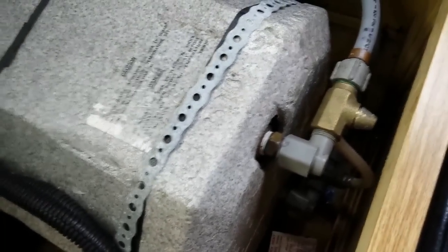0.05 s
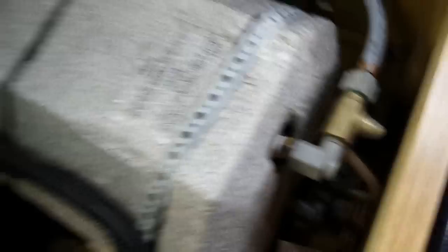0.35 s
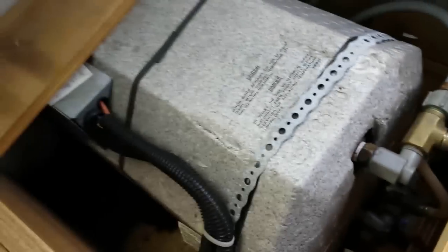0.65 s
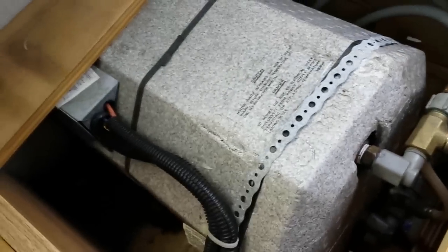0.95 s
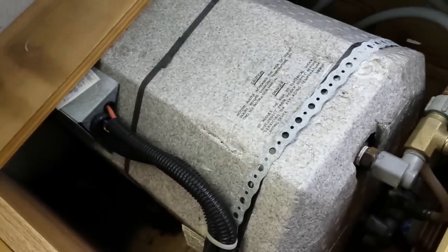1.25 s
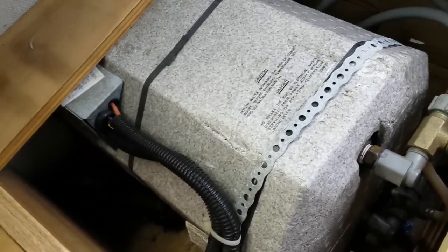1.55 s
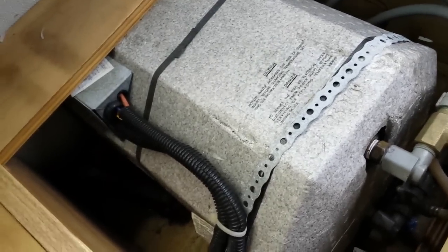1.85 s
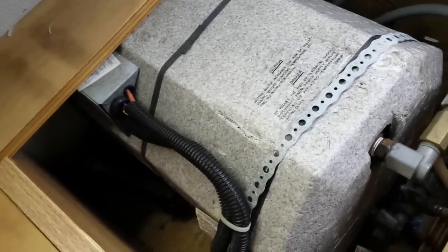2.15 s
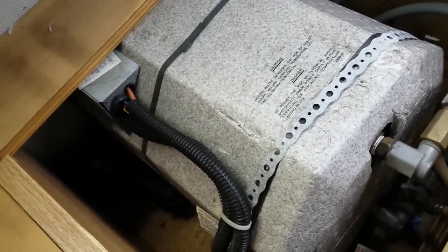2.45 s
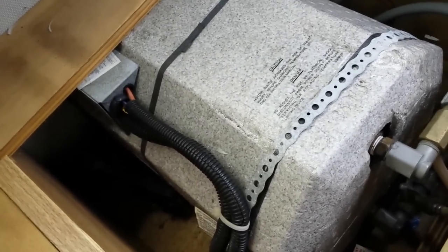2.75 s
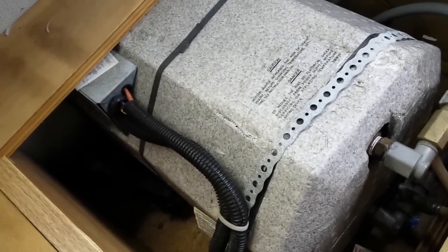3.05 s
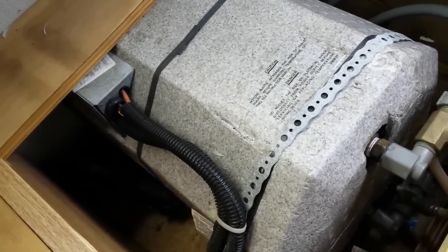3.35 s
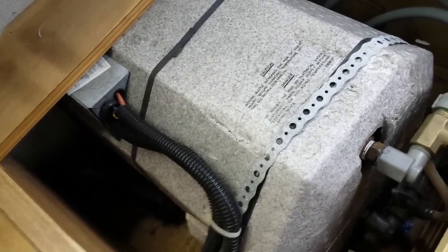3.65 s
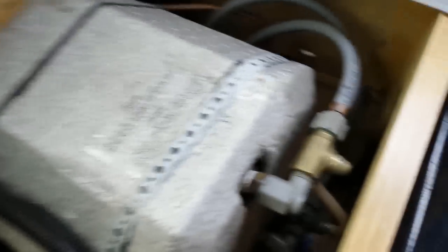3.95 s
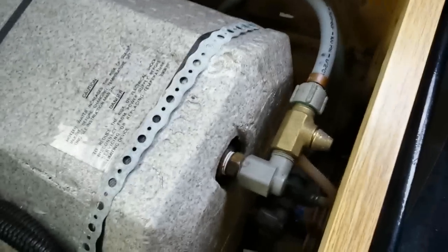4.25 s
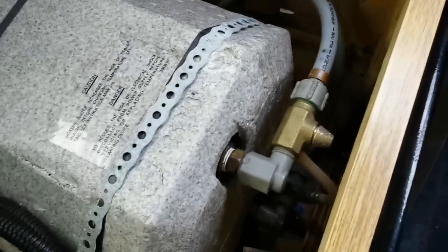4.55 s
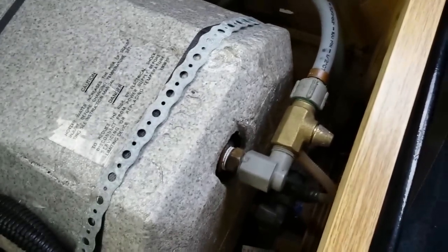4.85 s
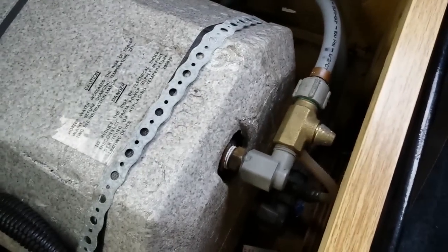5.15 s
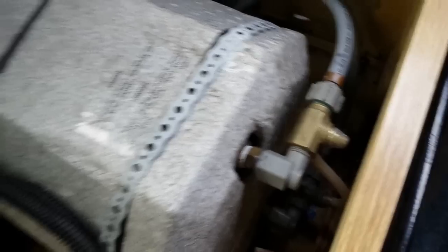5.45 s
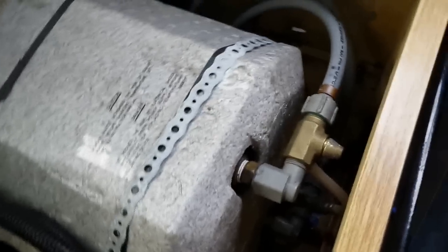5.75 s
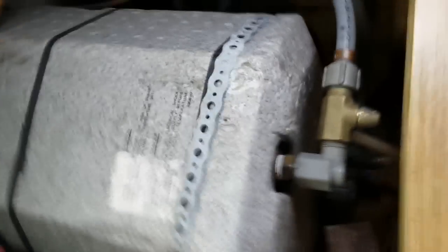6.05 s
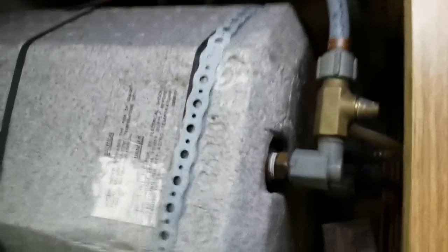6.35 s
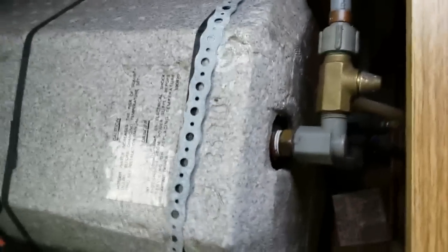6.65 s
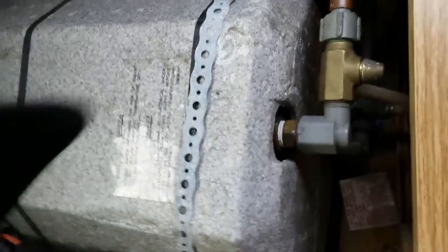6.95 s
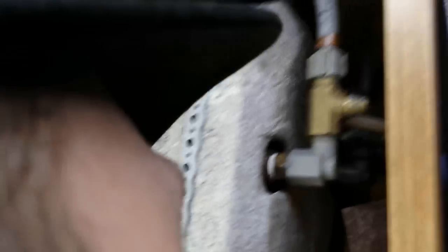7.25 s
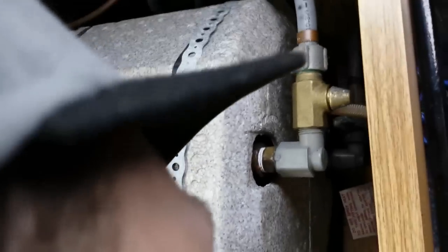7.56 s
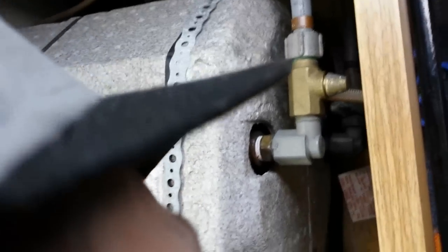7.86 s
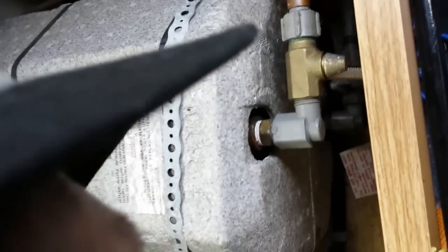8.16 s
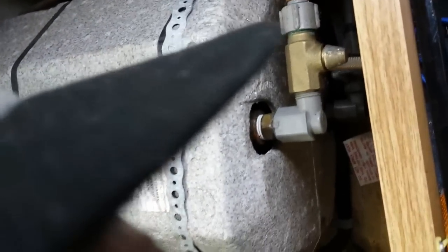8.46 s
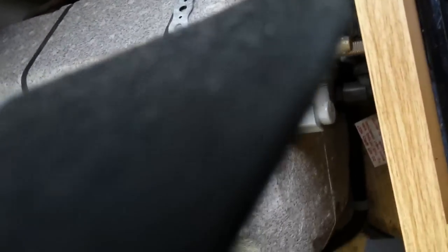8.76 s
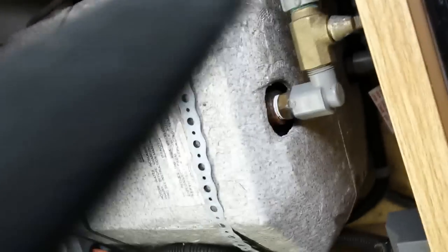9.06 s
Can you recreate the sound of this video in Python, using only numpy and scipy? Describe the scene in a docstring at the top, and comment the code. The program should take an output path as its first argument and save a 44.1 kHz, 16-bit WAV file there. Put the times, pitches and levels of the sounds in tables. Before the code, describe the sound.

A small water pump hums with a fast, light rattle inside a cupboard, while a louder, piercing hiss and squeal comes from a valve throughout. Heard close up with a moving microphone, the hiss wavers and slides in pitch, gaining a whistling howl about halfway. Two tiny bubble pops occur, one before the middle and one late, and cloth rubs softly against the microphone a few times between them.

```python
"""A nearly shut valve hisses and squeals as a diaphragm pump forces antifreeze through it.
The jet rings the pipework and surges with each turn of the pump, which hums and rattles in a van cupboard.
A hand-held microphone moves from above the tank to the pipe fitting and ends behind a rustling sleeve.
Echoes make the tone of the hiss slide as the hand sways. Two bubbles pop along the way."""
import sys
import numpy as np
from scipy import signal
from scipy.fft import rfft, irfft
from scipy.io import wavfile

SR = 44100
rng = np.random.default_rng(int(sys.argv[2]) if len(sys.argv) > 2 else 0)


def to_wav(sig):
    """Store sig (one row per channel, or 1-D mono) as 16-bit WAV at the path in sys.argv[1].

    Samples outside -1..1 are clipped; the rate is SR.
    """
    pcm = np.clip(np.atleast_2d(sig), -1, 1) * 32767
    pcm = np.round(pcm).astype(np.int16)
    wavfile.write(sys.argv[1], SR, pcm.T)  # frames by channels


N = 400855
TIME = np.arange(N) / SR
SIDES = np.array([[.5], [-.5]])  # splits a pan (left minus right, in dB) between the two channels


def from_db(db):
    """Turn decibels into a gain to multiply by."""
    return 10 ** (np.asarray(db) / 20)


def follow(rows, at):
    """Join a table's rows with straight lines and read each column at the given points."""
    points, *columns = np.transpose(rows)
    return [np.interp(at, points, column) for column in columns]


def colour(rows, hz):
    """Read a table of levels by frequency, with octaves evenly spaced."""
    points, *columns = np.transpose(rows)
    return np.array([np.interp(np.log(hz + 1), np.log(points + 1), column) for column in columns])


def wander(rate_hz):
    """A random wobble of about size 1, mostly slower than the given rate."""
    hz = np.fft.rfftfreq(N, 1 / SR)
    wobble = irfft(rfft(rng.standard_normal(N)) / np.sqrt(1 + (hz / rate_hz) ** 4), N)
    return wobble / wobble.std()


def to_spectra(x, size=1024):
    """Cut a sound into short slices; return frequencies, times and each slice's spectrum."""
    return signal.stft(x, SR, nperseg=size, noverlap=size - size // 4)


def to_sound(spectra, size=1024):
    """Join the slices again, scaled so that gains on white noise are levels per Hz."""
    return signal.istft(spectra, nperseg=size, noverlap=size - size // 4)[1][..., :N] * np.sqrt(SR / 2)


def low_noise(spectrum, spread):
    """Noise with the given spectrum; spread sets how much left and right differ."""
    common, apart = rng.standard_normal((2, N))
    hz, _, noise = to_spectra(common + 2 * SIDES * spread * apart)
    return to_sound(noise * from_db(colour(spectrum, hz)[0])[:, None])


def bell(hz, centre_hz, width_hz):
    """The shape of one resonance: a hump that is 1 at its centre."""
    return 1 / (1 + (2 * (hz - centre_hz) / width_hz) ** 2)


# The microphone's path (time [s], place [0 above the tank, 1 at the fitting, 2 behind the sleeve])
MIC_PATH = [(0, 0.3), (4.0, 0.012), (4.54, 0.84), (7.1, 0.92), (7.77, 1.94), (9.09, 1.83)]
def place_shares(t):
    """How much of the sound comes from each of the three microphone places."""
    place = np.clip(follow(MIC_PATH, t)[0], 0, 2)
    return np.maximum(1 - abs(place - np.arange(3)[:, None]), 0)


def turbulence(pops_per_s, pop_size):
    """Churning liquid makes noise, and collapsing vapour bubbles add clicks."""
    pops = (rng.random(N) < pops_per_s / SR) * rng.uniform(-1.5, 1.5, N) * pop_size
    noise = rng.standard_normal(N) + pops
    return noise / noise.std()


# How alike left and right are (frequency [Hz], likeness [0 to 1])
LIKENESS = [(1000, .78), (7000, .82), (15000, .65)]
# How far the left wave runs ahead of the right at each place (frequency [Hz], lead [radians])
LEAD_TANK = [(0, 0.0), (1852, -1.0), (2584, -6.8), (3833, -0.7), (4350, -5.3), (4910, -1.2), (5556, -4.4),
             (5814, 1.6), (6417, 5.0), (6675, 3.0), (6934, 3.3), (7020, 4.2), (7149, 8.0), (7407, 9.6),
             (7666, 13.6), (7967, 14.2), (8096, 14.8), (8140, 12.2), (8484, 17.7), (15030, 28.2)]
LEAD_FITTING = [(0, 0.0), (1852, -1.8), (2024, -5.8), (2584, -7.0), (4565, 10.0), (5168, 9.9), (5340, 6.5),
                (5771, 13.3), (6417, 11.3), (6503, 12.7), (6632, 11.9), (6675, 9.7), (6718, 9.5),
                (6761, 11.5), (7106, 10.8), (7450, 14.3), (7967, 7.6), (8355, 6.2), (8484, 10.7),
                (15030, 9.6)]
LEAD_SLEEVE = [(0, 0.0), (1723, -1.0), (2110, -6.3), (2799, -6.2), (3273, -9.6), (3531, -7.3), (4350, -8.5),
               (4479, -9.5), (4522, -12.1), (4867, -13.8), (4910, -15.6), (5469, -14.1), (6417, -15.2),
               (7106, -11.0), (7407, -12.0), (7450, -9.1), (7623, -5.7), (7709, -5.4), (8441, -10.1),
               (15030, -24.8)]
def jet(size):
    """The jet's noise, in slices: it reaches left and right partly alike and out of step."""
    noise = np.array([turbulence(pops_per_s=300, pop_size=4) for side in range(2)])
    hz, t, (left, unrelated) = to_spectra(noise, size)
    alike = colour(LIKENESS, hz)[0][:, None]
    leads = np.array([follow(rows, hz)[0] for rows in (LEAD_TANK, LEAD_FITTING, LEAD_SLEEVE)])
    phase = np.angle(np.exp(-1j * leads).T @ place_shares(t))
    right = alike * np.exp(1j * phase) * left + np.sqrt(1 - alike ** 2) * unrelated
    return hz, t, np.array([left, right])


# The broad hiss at each place (frequency [Hz], left level [dB per Hz], right level [dB per Hz])
HISS_TANK = [(1597, -81, -84), (1704, -62.5, -83.5), (2770, -76, -79), (4490, -84.5, -82),
             (6210, -59.5, -59.5), (7196, -58, -47.5), (7930, -67, -66.5), (9510, -81.5, -83.5),
             (11400, -72, -76.5), (15218, -89, -93)]
HISS_FITTING = [(1666,-78.5,-78.5), (1760,-65.5,-69), (2870,-62,-73.5), (4500,-63.5,-65.5),
                (6220,-64.5,-65.5), (7220,-54,-55.5), (7995,-56,-57), (9650,-79.5,-77.5),
                (11900,-76.5,-73.5), (15500,-104,-86.5)]
HISS_SLEEVE = [(1580, -81.5, -82.5), (1690, -71, -81), (2800, -76.5, -77.5), (4470, -59, -68.5),
               (6230, -64, -70), (7200, -66.5, -55), (7990, -68, -71.5), (9450, -79.5, -77.5),
               (12500, -80.5, -77), (15205, -93, -98)]
# Peaks and dips (negative) of pipes and cupboard (frequency [Hz], width [Hz], left [dB], right [dB])
PEAKS_TANK = [(1500, 52, -1, -18), (1904, 115, 3.3, 19), (2070, 150, 0.5, -8), (2370, 140, 8.5, 6),
              (2830, 110, -13.5, 0), (3276, 394, 19.5, 13), (3340, 83, -0.5, -15), (3736, 246, 17, 9.5),
              (3864, 140, 1, 11), (4220, 147, 15, 13.5), (4470, 127, 20, 8), (4853, 430, 17.5, 11.1),
              (5290, 210, 8.5, 6), (5474, 97, 14, -11), (6210, 194, -8.9, -6.5), (7050, 160, 2, -12.5),
              (7130, 200, 4, -4), (7900, 270, 11, 0.5), (8160, 113, -8, -7), (8460, 170, 10.5, 11)]
PEAKS_FITTING = [(1510,130,-5,-6), (2114,394,-14,-3.5), (2187,108,14.5,-1), (2870,125,-3.5,1),
                 (2965,150,6.5,-3), (3168,146,17.5,0), (3202,336,-20,-0.5), (3490,80,-10,-8),
                 (4590,130,-11,-13), (5289,119,-9,4.5), (5330,89,14,3), (5360,180,-10,-2), (5800,230,7,-5),
                 (6376,116,-2,-10), (6450,83,-3,-3), (6750,520,4.5,8), (7430,74,-11,-8), (7370,130,-15,5),
                 (7640,300,6,0.5), (8660,78,-3,-11)]
PEAKS_SLEEVE = [(1860, 100, 4.5, 4), (2230, 250, 11.5, 6), (3195, 260, -16, -2), (3230, 520, 17, 8.5),
                (3557, 130, -12, -7), (3907, 134, -4.5, 2), (4080, 111, -19, -6.0), (4520, 142, -14.5, -9),
                (5209, 276, -2, 7.5), (5470, 153, -6.1, -4.1), (6400, 210, -4, 9), (6650, 300, 16, 10.5),
                (6730, 220, -5.5, -16.5), (7500, 92, 14, 6), (7618, 260, -19, -5.5), (7760, 530, 14, 17.5),
                (8050, 170, -7, -1.6), (8250, 114, 17, -2), (8450, 183, 2, 12), (8944, 81, 1, 2)]
def pipework(hz, t):
    """The pipes ring at their own pitches, putting peaks on the broad hiss; returns dB."""
    places = (HISS_TANK, PEAKS_TANK), (HISS_FITTING, PEAKS_FITTING), (HISS_SLEEVE, PEAKS_SLEEVE)
    bass_cut_db = 55 * np.maximum(1 - hz / 1300, 0)  # a small jet makes no bass
    level_db = 0
    for share, (hiss, peaks) in zip(place_shares(t), places):
        ring_db = sum(np.outer(sides_db, bell(hz, centre, width)) for centre, width, *sides_db in peaks)
        level_db += share * (colour(hiss, hz) + ring_db - bass_cut_db)[:, :, None]
    return level_db


# How the hand's sway moves the echo peaks (time [s], main peak's pitch [Hz], depth [gain])
HAND_SWAY = [(0, 2360, 0.93), (0.25, 2500, 1.05), (0.47, 2509, 0.9), (0.76, 2314, 1.18), (1.12, 2610, 0.98),
             (1.4, 2390, 0.98), (1.66, 2270, 1.08), (2.02, 2690, 0.79), (2.15, 2457, 0.61),
             (2.52, 2620, 0.65), (2.75, 2340, 0.8), (2.95, 2020, 1.03), (3.08, 1957, 0.77),
             (3.36, 2470, 0.77), (3.71, 2650, 0.61), (4.02, 2860, 0.7), (4.21, 2400, 0.83),
             (4.41, 2560, 0.86), (4.68, 2886, 0.85), (5.25, 2750, 0.82), (5.69, 2930, 0.74),
             (6.06, 3100, 0.64), (6.46, 2990, 0.97), (7.16, 2950, 0.77), (7.45, 3352, 1.31),
             (7.92, 2740, 0.57), (8.38, 2710, 0.73), (8.62, 1990, 0.74), (8.8, 1830, 0.96), (9.09, 2040, 1)]
# Echo peaks and dips at rest (frequency [Hz], width [Hz], above the tank [dB], at the fitting [dB],
# behind the sleeve [dB], how strongly it follows the sway [exponent])
ECHO_PEAKS = [(1856,230,10.5,6.5,15,0.96), (2327,287,-8,-13.5,3,1), (2565,437,12,12.5,5,1.16),
              (3470,426,9,4,15,0.94), (3790,440,-8.5,-6,-13.5,1.16), (4195,610,7.5,11.5,5.5,0.82),
              (5400,280,-3,6,5.5,1.13), (6570,820,-5.5,-3.5,0.5,0.89), (7050,310,3.5,-2.5,5,0.67)]
def echoes_and_howl(hz, t, rest_hz=2500, howl_onset_hz=2060, howl_full_hz=3035):
    """Tank and wall echoes add sliding peaks, in dB; as they slide up, a pipe by the fitting howls."""
    hz, shares = hz[:, None], place_shares(t)
    pitch, depth = follow(HAND_SWAY, t)
    tremble = np.interp(t, TIME, wander(rate_hz=7.8))
    sputter = np.interp(t, TIME, wander(rate_hz=27))
    stretch = pitch / rest_hz * (1 + 0.0043 * tremble)
    echo_db = depth * sum((np.array(place_db) @ shares) * bell(hz, centre * stretch ** power, width)
                          for centre, width, *place_db, power in ECHO_PEAKS)
    drive = shares[1] * np.clip((pitch - howl_onset_hz) / (howl_full_hz - howl_onset_hz), 0, 1)
    howl_hz = 2230 * stretch ** 0.15 * (1 + 0.0058 * tremble)  # pulled along a little by the slide
    howl_db = (17 + 0.9 * sputter) * drive * bell(hz, howl_hz, width_hz=244)
    return np.array([echo_db + howl_db, echo_db + 0.65 * howl_db])


# Whistles in the hiss (middle time [s], half length [s], pitch [Hz], glide [Hz per s], width [Hz],
# left boost [dB], right boost [dB])
WHISTLES = [(.2,0.21,7120,0,260,7.5,3), (.59,.15,7100,-900,240,8.5,6), (.74,.19,3320,744,255,11.5,8),
            (1.497,0.26,3440,-918,339,10,12), (1.59,.17,3860,338,282,7,6.6),
            (2.114,.096,3800,-1450,341,13.5,14), (2.66,.08,3820,-2000,300,14,14),
            (2.757,0.078,3370,-2700,300,13.5,16), (2.892,0.055,3780,-3300,200,13,6),
            (2.99,0.04,3330,-2600,200,13,15), (3.234,.11,3880,1250,244,7,6.7),
            (3.32,.11,2320,2040,240,12.5,9), (4.077,.12,3800,-1282,415,8.5,6),
            (4.434,.12,2630,1239,232,8,4.4), (4.53,0.15,6000,1047,276,11,5), (5.1,1,7300,20,190,9,12.5),
            (6.75,0.31,5540,176,467,10,-3), (6.86,0.58,7780,-553,568,-1,10.5),
            (7.36,0.18,8200,422,568,5,11), (7.464,.29,2620,-92,443,0,9), (7.987,0.38,4530,-341,395,10,12),
            (8.48,0.14,3550,-4600,300,16.5,16), (8.69,.05,3300,-3400,257,11,3),
            (8.74,0.074,2590,-1402,270,15,17), (8.977,.15,3290,1378,348,13,8),
            (8.95,0.24,6730,900,800,5.5,10.5)]
def whistles(hz, t):
    """Each whistle is a narrow boost, in dB, that swells, glides and fades, with a dip on either side."""
    boost_db = 0
    for middle_s, half_s, pitch_hz, glide, width_hz, *sides_db in WHISTLES:
        centre_hz = pitch_hz + glide * (t - middle_s)
        peak = bell(hz[:, None], centre_hz, width_hz)
        skirt = bell(hz[:, None], centre_hz, 2.1 * width_hz)
        swell = np.exp(-((t - middle_s) / half_s) ** 2)
        boost_db += np.multiply.outer(sides_db, swell * (peak + 0.88 * (peak - skirt)))
    return boost_db


def cupboard(hz, t, echoes):
    """Short echoes off the walls ripple the spectrum on each side and drift as the hand sways."""
    response = np.ones((2, len(hz), len(t)), complex)
    for side in response:
        for delay_s, sway_hz, start in rng.uniform((.004, .2, 0), (.011, .7, 1), (echoes, 3)):
            late_s = delay_s + 7e-5 * np.sin(2 * np.pi * (sway_hz * t + start))
            side += .11 * np.exp(-2j * np.pi * hz[:, None] * late_s)
    return response


# The jet's strength, heard in the squeal (time [s], level [dB])
FLOW = [(0.0, 4), (0.55, 4), (0.88, 1.25), (3.1, 1.2), (3.93, 1), (4.3, 1.7), (6.13, 2.5), (7.3, 0.4),
        (7.8, -0.7), (8.3, 1), (8.6, 0.5), (9.09, 0.5)]
# Brief spurts of the squeal (time [s], boost [dB])
SPURTS = [(.2, 1.5), (1.23, 1), (3.12, 1), (4.16, 2.5)]
def flow(spurt_s=0.063):
    """The jet's strength in dB: a slow drift with brief spurts."""
    return follow(FLOW, TIME)[0] + sum(db * np.exp(-((TIME - s) / spurt_s) ** 2) for s, db in SPURTS)


def surge(turns, lag, skew):
    """The pressure rises to a pointed crest once a turn; skew tilts the crest."""
    return np.cos(2 * np.pi * (turns - lag)) + 0.49 * np.cos(4 * np.pi * (turns - lag - skew))


# What turning the microphone does, and how bright the highest fizz is (time [s], squeal pan [dB], hiss pan
# [dB], fizz boost [dB])
MIC_TURN = [(0.0, -3, -1.5, -4.5), (0.61, -2.5, -2.5, -5.5), (1.13, -4, 0.5, -5), (3.26, -3, 0.4, -9),
            (4.42, -2.5, -1.5, -4), (5.75, 0, -0.6, -4.3), (6.31, -1, -0.5, -3.5), (6.99, -2.5, 0, -1.5),
            (7.4, 2, -3, 1), (7.65, 5, -1.8, 1), (8.47, -1, -1.5, -1), (9.09, -1, -2.5, -7.5)]
def valve(turns, size=1600):
    """The jet rings the pipework; pump pressure makes the high squeal and lower hiss surge and flutter."""
    hz, t, noise = jet(size)
    level_db = pipework(hz, t) + echoes_and_howl(hz, t) + whistles(hz, t)
    fizz_share = np.clip((hz[:, None] - 9000) / 2500, 0, 1)
    level_db += fizz_share * follow(MIC_TURN, t)[2]  # the highest fizz grows brighter and duller over time
    spectra = noise * from_db(level_db) * cupboard(hz, t, echoes=6)
    squeal_share = np.clip((hz[:, None] - 5000) / 1500, 0, 1)
    squeal = to_sound(spectra * squeal_share, size)
    hiss = to_sound(spectra * (1 - squeal_share), size)

    squeal_pan, hiss_pan, _ = follow(MIC_TURN, TIME)
    flutter = wander(rate_hz=19)
    pulse_db = 0.52 + 0.46 * place_shares(TIME)[0]  # the squeal pulses most above the tank
    squeal_db = flow() + SIDES * squeal_pan + .7 * flutter + pulse_db * surge(turns, lag=.28, skew=0)
    hiss_db = -2 + SIDES * hiss_pan + .72 * flutter + 1.62 * surge(turns, lag=-.18, skew=.16)
    hiss_db += .72 * wander(rate_hz=3.3)  # the hiss also wavers by itself
    return squeal * from_db(squeal_db) + hiss * from_db(hiss_db)


# The pump's tones (harmonic [times the shaft speed], level above the tank [dB], at the fitting [dB])
PUMP_TONES = [(2, -59, -59), (3, -59, -59), (4, -55, -55), (5, -55, -56), (6, -39, -38), (7, -47, -47),
              (9, -60, -59), (10, -60, -62), (11, -63, -56), (12, -54, -48), (13, -60, -62), (15, -61, -62),
              (18, -54, -54), (19, -61, -59), (21, -57, -59), (24, -66, -67), (25, -58, -60),
              (26, -65, -66), (28, -66, -67), (29, -57, -60), (30, -56, -62), (31, -56, -61),
              (34, -66, -66), (35, -63, -58), (37, -67, -66), (38, -65, -65), (40, -64, -60),
              (48, -69, -70)]
def pump_hum(turns):
    """Once a turn the strong tones swell into a throb; the lowest ones and a buzz fall between throbs."""
    near = np.clip(follow(MIC_PATH, TIME)[0], 0, 1)
    listed = [row[0] for row in PUMP_TONES]
    buzz_db = {harmonic: -60.5 - 0.67 * harmonic for harmonic in range(14, 56) if harmonic not in listed}
    buzz = [(harmonic, db, db) for harmonic, db in buzz_db.items()]
    hum = np.zeros(N)
    for harmonic, tank_db, fitting_db in PUMP_TONES + buzz:
        # Tones with the same lag peak together; scatter blurs that peak.
        lag, scatter = (.56, .25) if harmonic < 5 else (0, .08) if harmonic < 8 else (.32, .4)
        cycles = harmonic * (turns - lag) + scatter * rng.random()
        level_db = tank_db + near * (fitting_db - tank_db)
        hum += np.sqrt(2) * from_db(level_db) * np.cos(2 * np.pi * cycles)
    return hum * from_db(.5 * wander(rate_hz=16) + SIDES * .5)


# The pump's rumble on its mount (frequency [Hz], level [dB per Hz])
MOUNT_RUMBLE = [(15, -83), (35, -93), (70, -68), (140, -73), (220, -77.5), (450, -81), (620, -83),
                (850, -87), (1300, -87), (2000, -100)]
def rattle(turns):
    """Six valve beats a turn shake the mount; each turn brings a throb, a soft knock and a hard one."""
    beats = 0.79 + 0.42 * np.exp(-(6 * turns % 1) / 0.56)
    throb = 1 + 0.18 * np.cos(2 * np.pi * (turns - .3))
    soft_knock = 0.23 * np.exp(-((turns - .26) % 1) / 0.026)
    hard_knock = 0.55 * np.exp(-((turns - .92) % 1) / 0.047)
    shake = low_noise(MOUNT_RUMBLE, spread=.3)
    return shake * (beats * throb + soft_knock + hard_knock) * from_db(SIDES * 9.5 - 1.5)


# Steady hums (pitch [Hz], level [dB])
DRONES = [(120, -61), (147, -56.5), (368, -64)]
def drones():
    """Faint hums waver slightly, out of step with the pump."""
    return sum(np.sqrt(2) * from_db(db) * np.sin(2 * np.pi * hz * TIME + 0.44 * wander(rate_hz=3))
               for hz, db in DRONES)


# Bubble pops (time [s], pitch [Hz], peak level [dB], length [s], pan [dB])
BUBBLES = [(3.352, 1356, -31.5, 0.014, 8), (8.164, 970, -25.5, 0.025, -5)]
def bubbles():
    """Each bubble pops and rings at one pitch for a moment."""
    pops = np.zeros((2, N))
    for start_s, hz, peak_db, length_s, pan_db in BUBBLES:
        age = np.maximum(TIME - start_s, 0)
        rise = 1 - np.exp(-age / 0.00055)
        fade = np.exp(-np.minimum(age / (0.62 * length_s), 5) ** 3)
        pops += from_db(peak_db + SIDES * pan_db) * rise * fade * np.sin(2 * np.pi * hz * age)
    return pops


# The tone of rubbing cloth (frequency [Hz], level [dB per Hz])
CLOTH_TONE = [(30, -85), (150, -83.5), (330, -73.5), (600, -80), (1200, -86.5), (3000, -108)]
# Strokes of the sleeve past the microphone (time [s], hold [s], level [dB])
SLEEVE_STROKES = [(5.85, 0.22, 1.5), (6.3, 0.19, -2), (7.324, 0.1, -3), (8.6, .4, -28)]
def sleeve(rise_s=0.14, fall_s=0.1):
    """Cloth brushes by in a few strokes, over a faint rustle that grows as the microphone nears it."""
    rub = from_db(-10) * follow(MIC_PATH, TIME)[0]
    for start_s, hold_s, db in SLEEVE_STROKES:
        before = np.maximum(start_s - TIME, 0) / rise_s
        after = np.maximum(TIME - start_s - hold_s, 0) / fall_s
        rub += from_db(db) * np.exp(-(before + after) ** 2)
    return low_noise(CLOTH_TONE, spread=0.67) * rub


# The pump's shaft, speeding up slightly (time [s], speed [turns per s])
SHAFT_SPEED = [(0, 15.585), (5, 15.655), (9.09, 15.76)]
def scene():
    """One shaft drives hiss, hum and rattle together; drones, bubbles and the sleeve join them."""
    speed = follow(SHAFT_SPEED, TIME)[0] * (1 + 0.0023 * wander(rate_hz=4.2))
    turns = 0.0808 + np.cumsum(speed) / SR
    return valve(turns) + pump_hum(turns) + rattle(turns) + drones() + bubbles() + sleeve()


def record(dry, cutoff_hz=15400):
    """Cut away the very highest treble."""
    low_pass = signal.firwin(511, cutoff_hz, window=("kaiser", 9), fs=SR)
    return signal.oaconvolve(dry, low_pass[None], "same")


dry = scene()
out = record(dry)
to_wav(out)
```